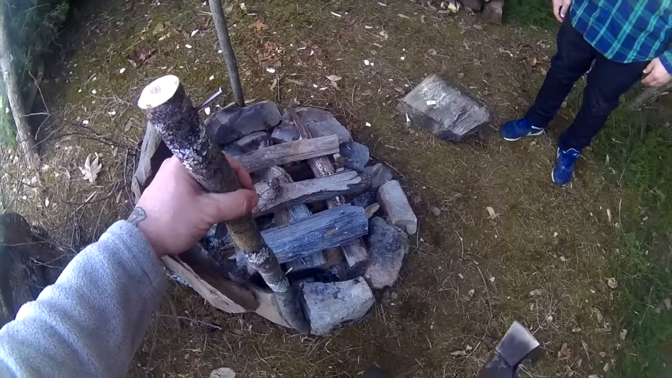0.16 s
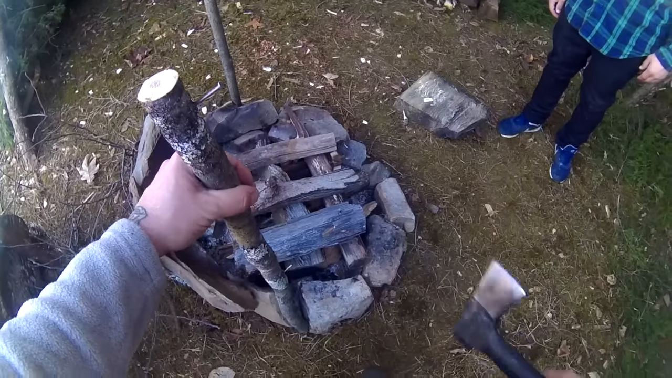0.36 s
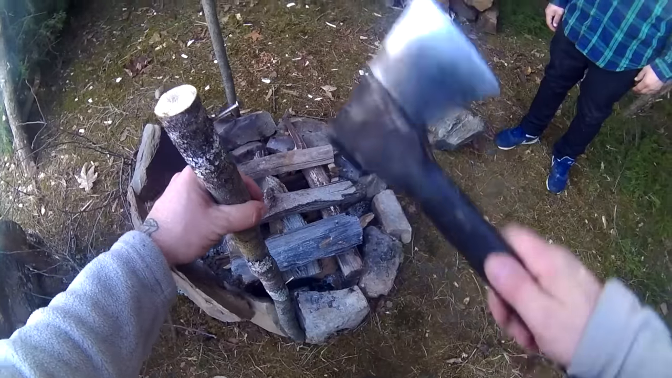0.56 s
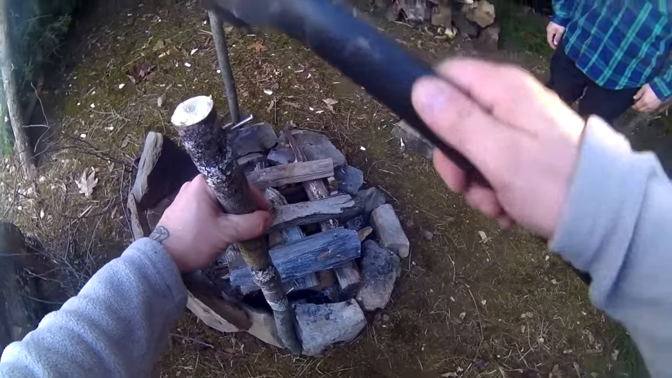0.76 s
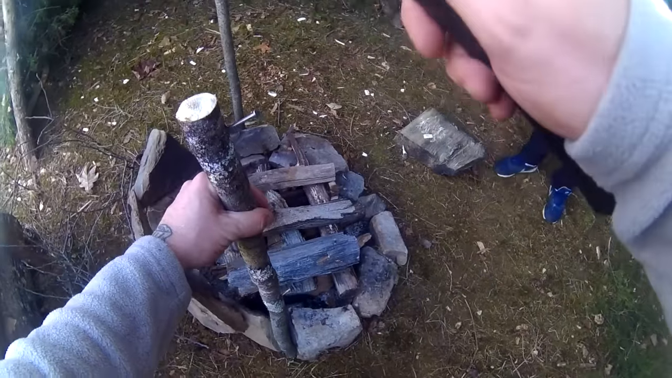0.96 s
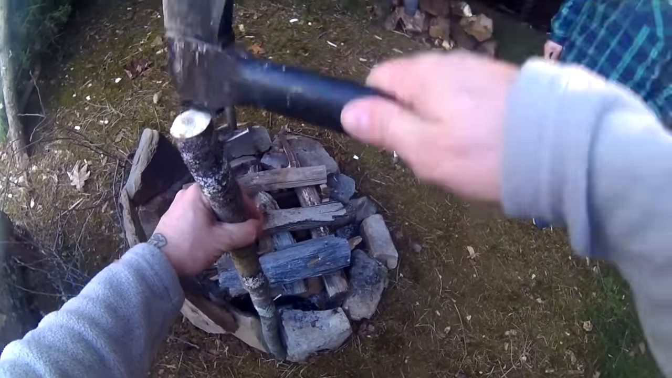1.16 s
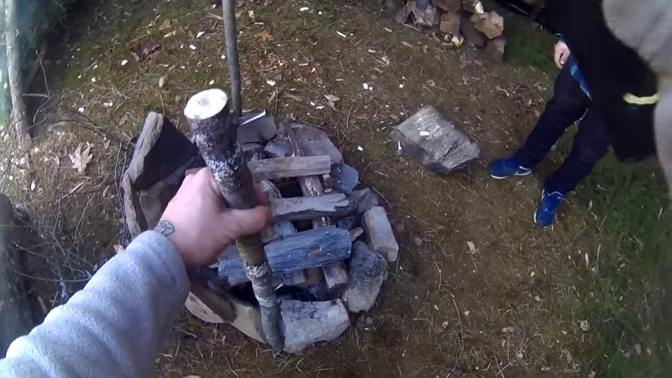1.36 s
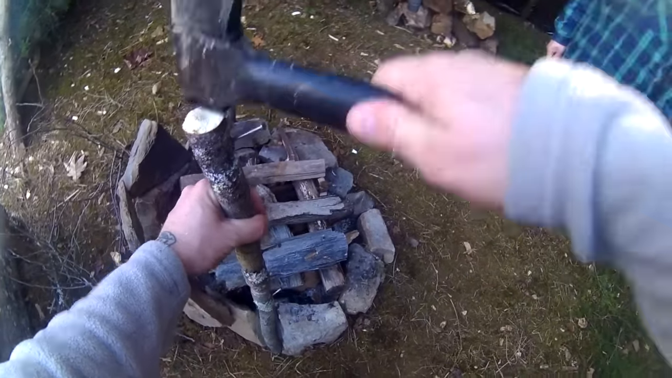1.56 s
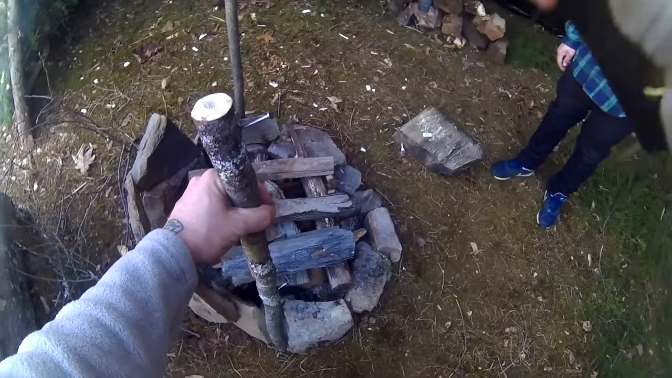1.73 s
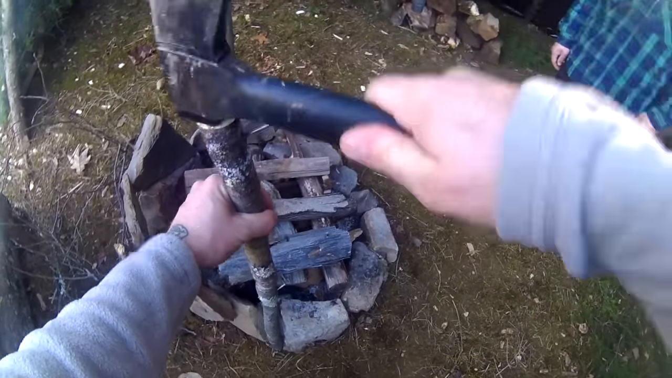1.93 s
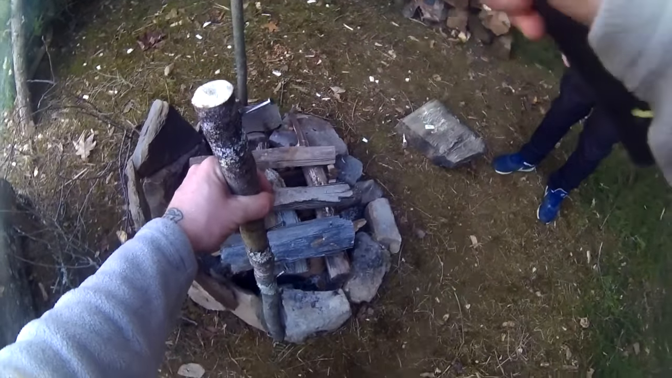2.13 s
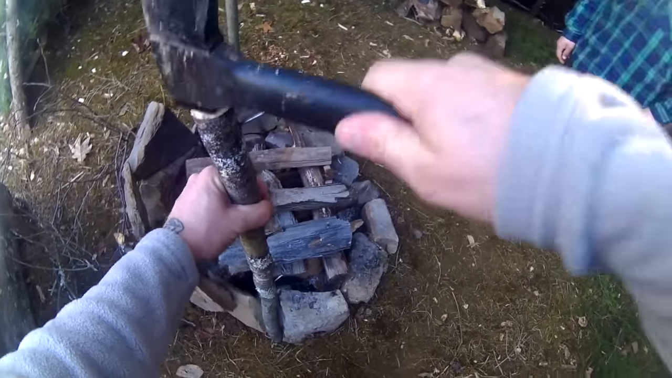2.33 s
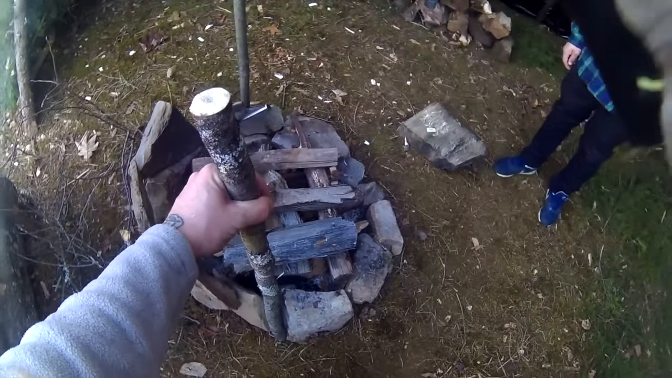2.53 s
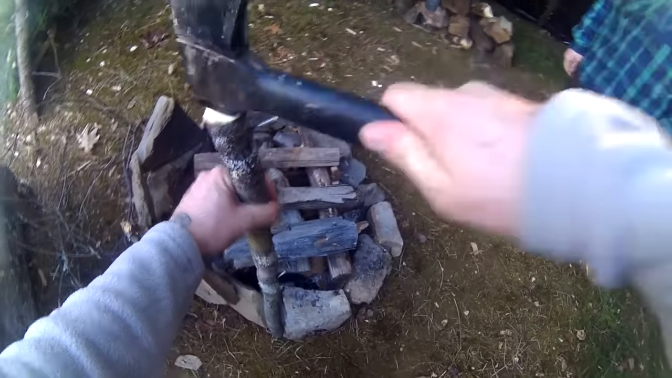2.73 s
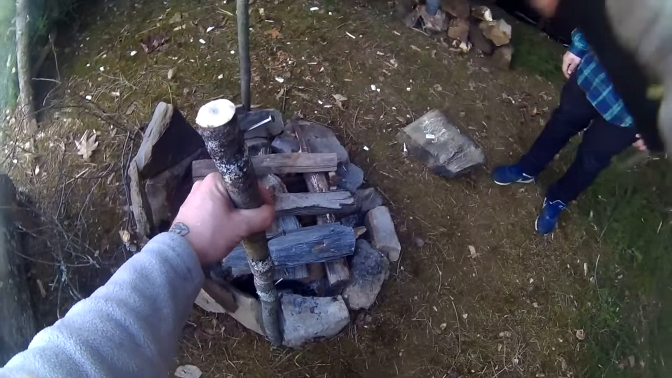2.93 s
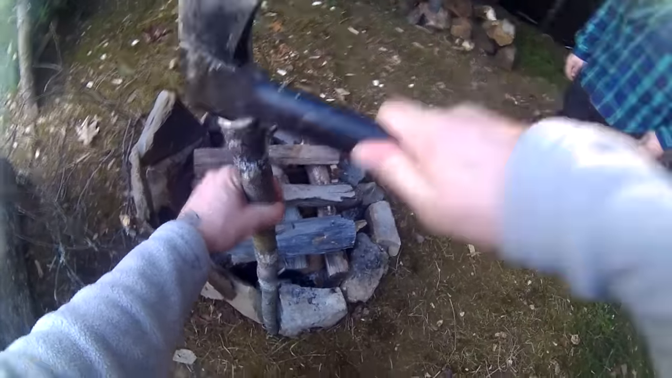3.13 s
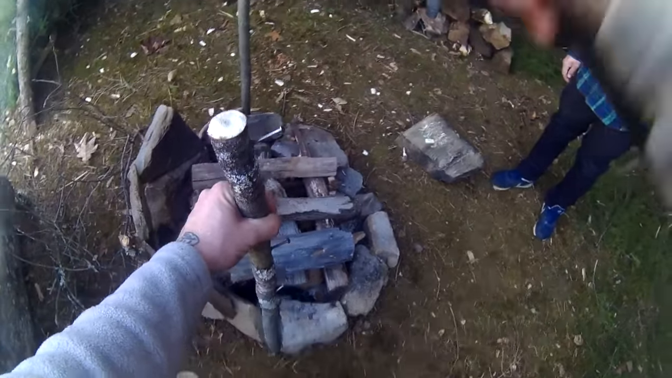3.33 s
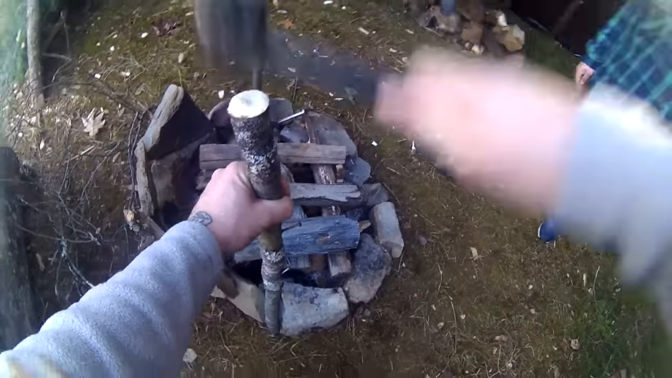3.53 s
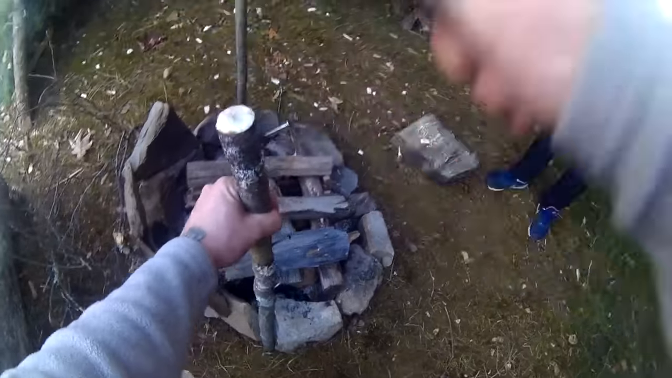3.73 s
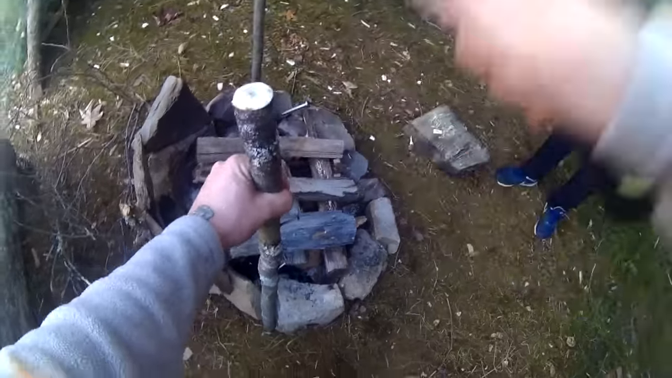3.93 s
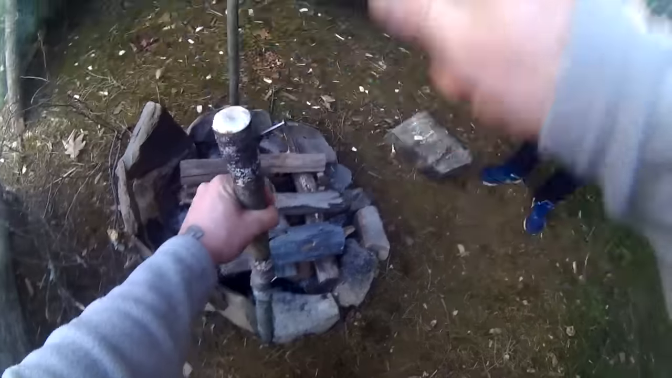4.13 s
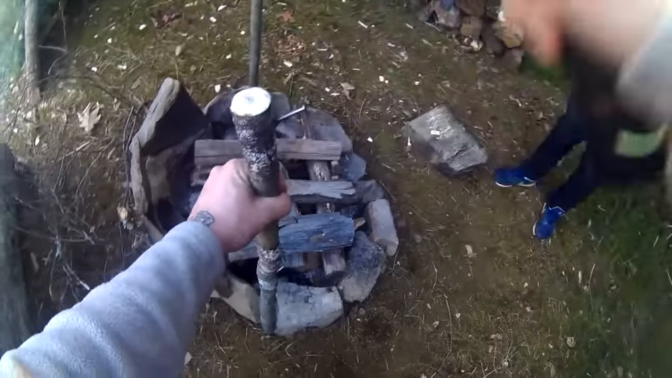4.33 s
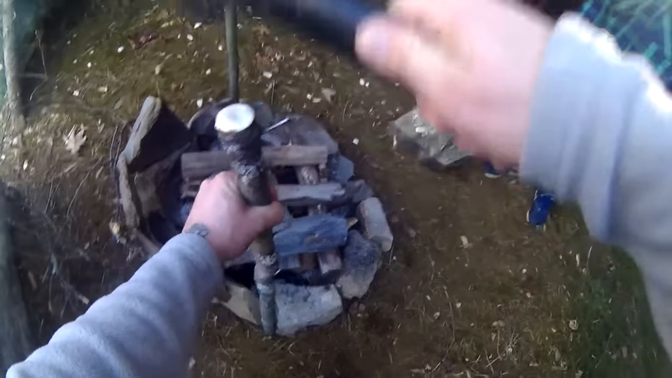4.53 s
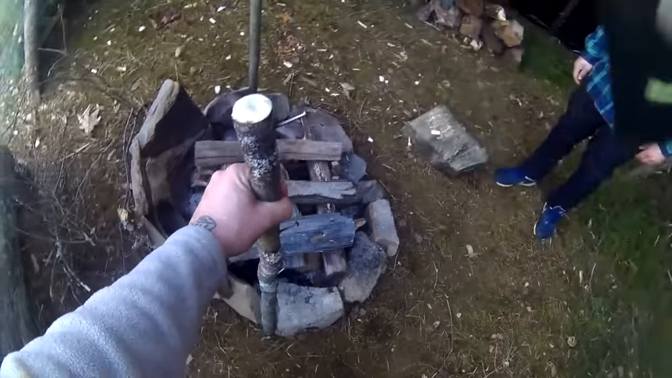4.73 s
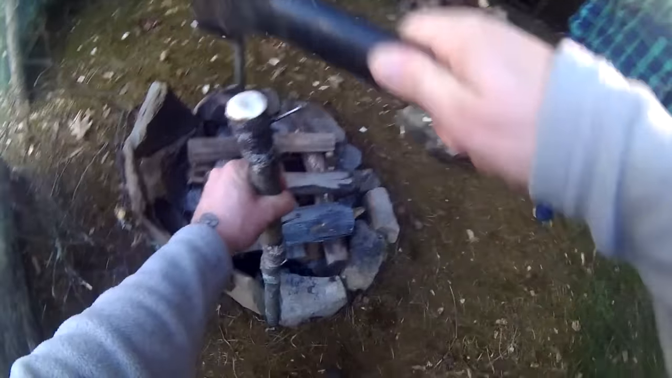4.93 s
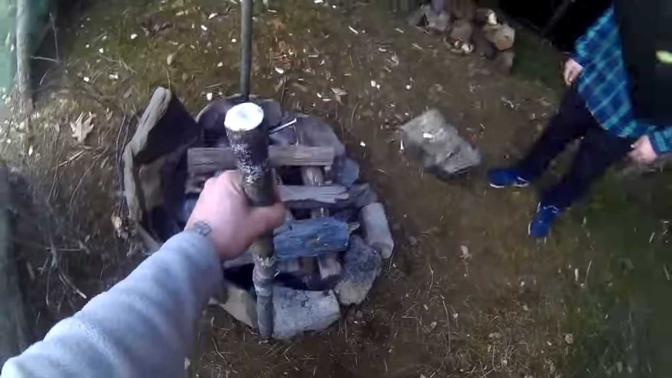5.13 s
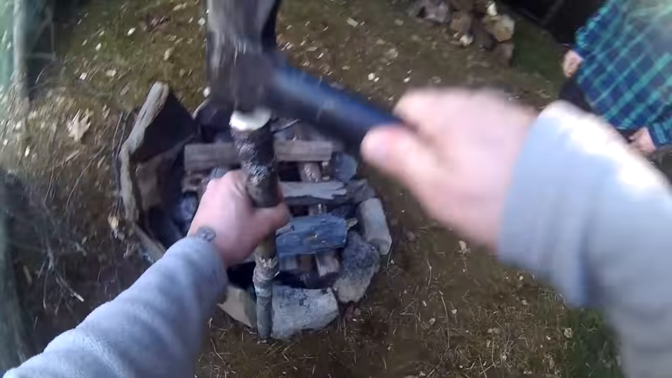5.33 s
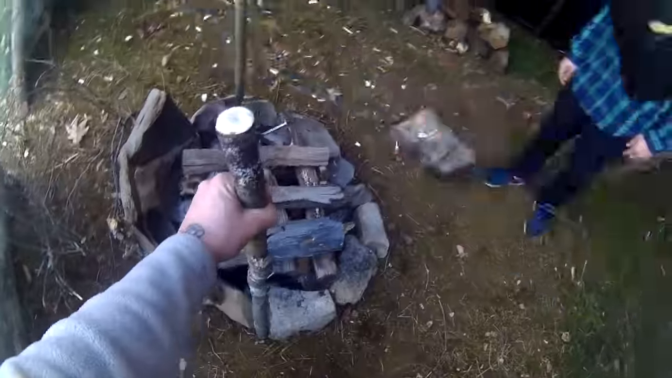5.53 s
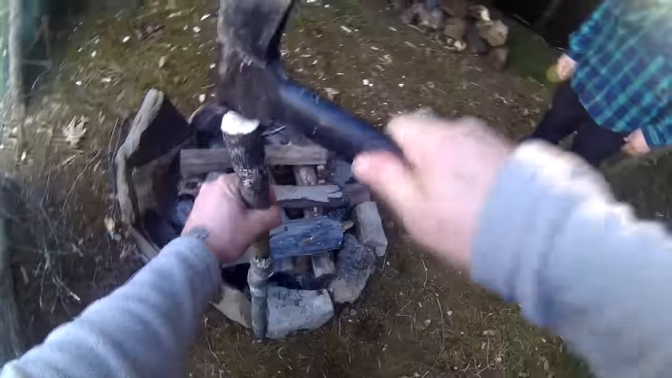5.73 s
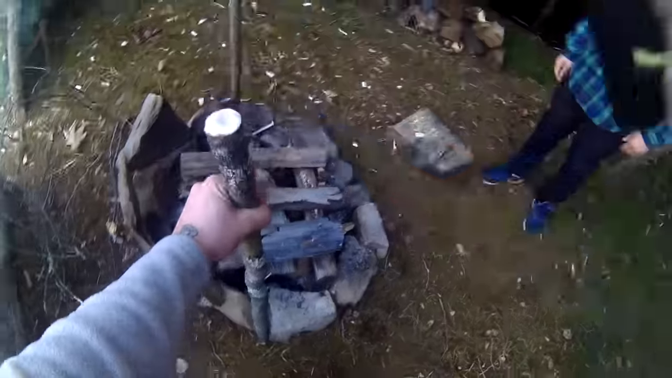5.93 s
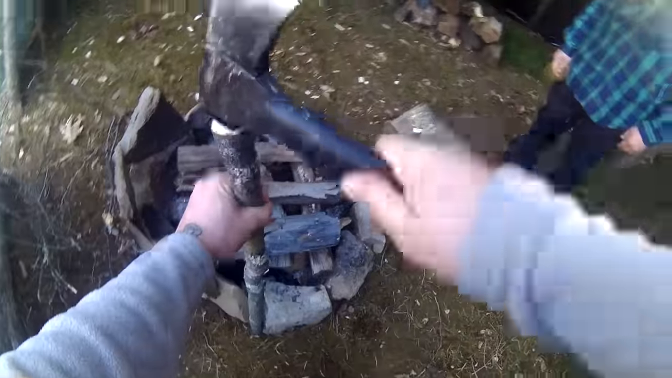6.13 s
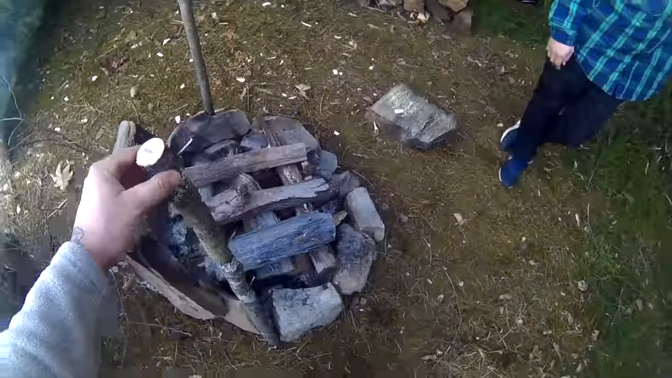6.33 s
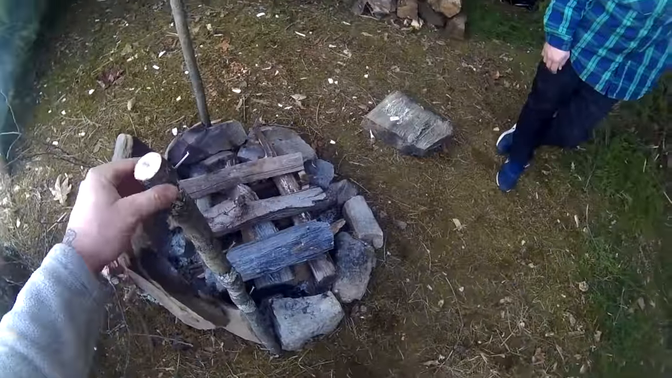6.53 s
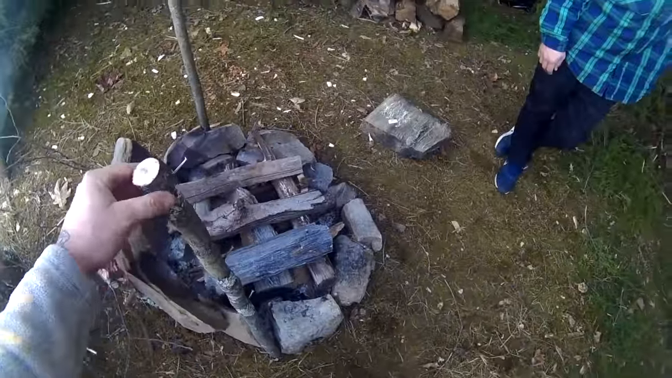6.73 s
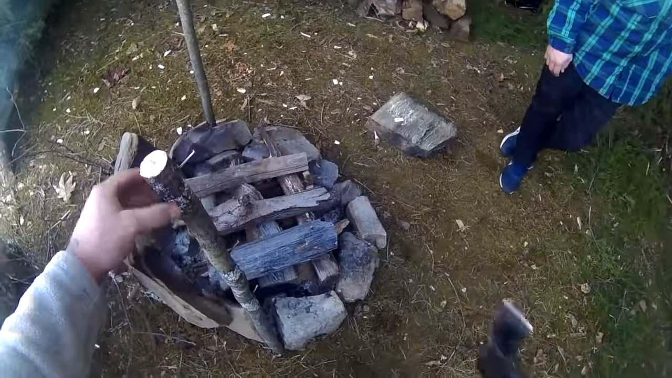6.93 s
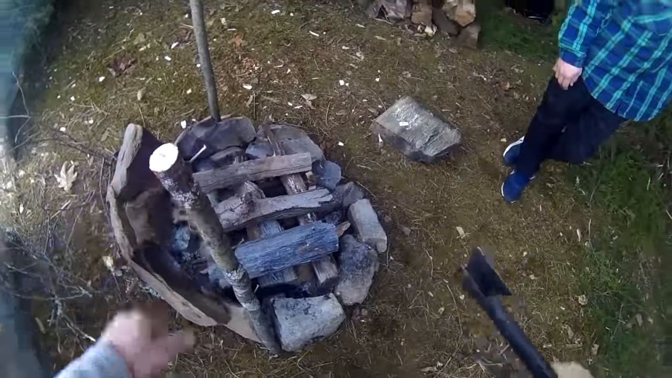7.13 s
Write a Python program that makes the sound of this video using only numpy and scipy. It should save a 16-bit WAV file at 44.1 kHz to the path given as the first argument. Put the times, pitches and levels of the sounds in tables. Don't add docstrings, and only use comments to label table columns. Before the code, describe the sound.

A sharp knock lands immediately at 0.02 s: a hatchet's blunt steel back on a wooden stake, very close and coloured by a ringing plastic case. About a second of quiet hiss, faint sleeve rustle and tiny scuffs follows. From 1.07 s the pounding resumes with a softer blow, a strong bright one at 1.46, then lesser hits at 1.85 and 2.23. From 2.68 to 6.03 s the knocks come evenly, about every 0.4 s, mostly loud and hard, with crisp metallic cracks, short woody thuds, a quick ground slap and a grainy echo dying within a fraction of a second. Low strap shudders and small taps fall between them, notably around 3.6, 5.7 and 6.1 s. After the last blow, only light taps at 6.4, 6.85 and 7.1 s, rustling, soft outdoor hiss, low hum, a very faint high whine and brief faint electronic buzzes remain.

```python
import sys
import numpy as np
from scipy import signal
from scipy.fft import rfft, irfft, next_fast_len
from scipy.io import wavfile
from scipy.ndimage import uniform_filter1d

SR = 44100
rng = np.random.default_rng(int(sys.argv[2]) if len(sys.argv) > 2 else 0)


def invert_db(x):
    u = np.asarray(x, float) / 20
    return 10 ** u


def store_pcm(level_fs):
    pcm = np.round(np.clip(level_fs, -1, 1) * 32767).astype(np.int16)
    wavfile.write(sys.argv[1], SR, np.atleast_2d(pcm).T)


N = 316193


def evened(x):
    return x / np.sqrt(np.mean(x ** 2) + 1e-20)


def peaked(x):
    return x / abs(x).max()


def read(points, hz):
    f, value = np.transpose(points)
    return np.interp(np.log(hz + 1), np.log(f + 1), value)


def add(mix, s, sound):
    part = mix[max(round(s * SR), 0):][:len(sound)]
    part += sound[:len(part)]


def band(x, lo_hz, hi_hz):
    return signal.sosfilt(signal.butter(2, [lo_hz, hi_hz], "bandpass", fs=SR, output="sos"), x)


def coloured(x, points):
    size = next_fast_len(len(x))
    gain = invert_db(read(points, np.fft.rfftfreq(size, 1 / SR)))
    return irfft(rfft(x, size) * gain, size)[:len(x)]


def fuzzy(hz, width):
    r = np.exp(-np.pi * width / SR)
    noise = rng.standard_normal(N) + 1j * rng.standard_normal(N)
    slow = signal.lfilter([1], [1, -2 * r, r * r], noise)
    carrier = np.exp(2j * np.pi * hz * np.arange(N) / SR)
    return evened((slow * carrier).real)


def rings(modes):
    t = np.arange(SR // 3) / SR
    return sum(invert_db(db - 60 * t / t60) * np.sin(2 * np.pi * hz * t) for hz, db, t60 in modes)


def driven(force, response):
    return signal.oaconvolve(force, response)[:len(force)]


def push(t, s, ms):
    u = np.clip((t - s) * 1000 / ms, 0, 1)
    return np.sin(np.pi * u) ** 2 / (ms * SR / 2000)


def debris(length, t60):
    t = np.arange(length) / SR
    swelling = invert_db(-60 * t / t60) * (1 - np.exp(-t / 0.0012))
    return swelling * rng.standard_normal(length) * (rng.random(length) < .3)


def swell(events, peak_s, rest_db, order):
    t = np.arange(N) / SR
    level = invert_db(rest_db)
    for s, db in events:
        u = np.maximum(t - s, 0) / peak_s
        level = level + invert_db(db) * (u * np.exp(1 - u)) ** order
    return level


# f/Hz, level/dB (per Hz)
AIR = [(15, -25), (25, -3), (68, 3), (108, -10.5), (170, -6), (560, -17), (1400, -21), (2990, -25),
       (8360, -28.5), (10100, -29.5), (11000, -27.5), (15700, -31), (16100, -50)]


def air():
    hz, t, z = signal.stft(rng.standard_normal(N), SR, nperseg=2048)
    smooth = uniform_filter1d(rng.standard_normal(z.shape), 12, 0)
    patches_db = .8 * evened(uniform_filter1d(smooth, 3, 1))
    wash = signal.istft(z * invert_db(read(AIR, hz)[:, None] + patches_db), SR, nperseg=2048)[1][:N]
    return invert_db(-66) * evened(wash)


# f/Hz, width/Hz, level/dB
HUM = [(58.4, 39, -77), (92.6, 5.9, -83.5), (119, 9, -79), (164.5, 29, -81.5)]


def hum():
    return sum(invert_db(db) * fuzzy(hz, width) for hz, width, db in HUM)


# f/Hz, level/dB
WHINE = [(9755, -97), (9905, -94), (9981, -85), (10018, -93), (10056, -86), (10137, -92), (10212, -94),
         (12699, -99)]


def whine():
    t = np.arange(N) / SR
    tones = sum(invert_db(db + 3) * np.sin(2 * np.pi * (hz * t + rng.random())) for hz, db in WHINE)
    return tones + invert_db(-85.5) * fuzzy(10020, 390)


# f/Hz, level/dB, t60/s
CASE = [(1105, -14.5, 0.015), (960, -32.5, .02), (1484, -21.5, 0.045), (1510, -27.5, 0.033),
        (1761, -18, 0.058), (1671, -33.5, 0.1), (2166, -26.5, 0.013), (2330, -25, 0.085),
        (2877, -19.5, 0.016), (4420, -50, 0.12)]
# f/Hz, level/dB
PORT = [(250, -53), (880, -11.5), (1030, -37.5), (1110, 2), (1550, 11.5), (1850, 4.5), (2900, -4.5),
        (3250, -22.5), (3800, -6.5), (4500, -9.5), (4950, -36), (5700, -15), (6600, -39), (9000, -49.5)]


def case(hard_db):
    hz = abs(np.fft.fftfreq(4096, 1 / SR))
    lift_db = hard_db / (1 + np.exp((2300 - hz) / 200))
    log_gain = np.log(invert_db(read(PORT, hz) + lift_db))
    colour = np.fft.ifft(np.exp(signal.hilbert(log_gain).conj())).real[:2048]
    response = rings(CASE)
    add(response, 0, peaked(colour))
    return response


# t/s, level/dB
RUSTLE = [(0.0, -69.5), (0.38, -85), (0.68, -71.5), (2.2, -79.5), (3.201, -70), (4.33, -80), (4.952, -75.5),
          (6.09, -76.5), (6.4, -72), (6.71, -72), (7.1, -71.5)]


def rustle():
    s, db = np.transpose(RUSTLE)
    grains = invert_db(1.9 * rng.exponential(1, N)) * rng.standard_normal(N)
    grains *= rng.random(N) < 2500 / SR
    level_db = np.interp(np.arange(N) / SR, s, db) - 8
    return invert_db(level_db) * evened(driven(grains, case(-5)))


def sway():
    swings = [(s, -45.5 + 0.87 * db) for s, db, *_ in BLOWS]
    jerks = [(s, -51 + 0.96 * db) for s, db, *_ in BLOWS]
    jerks += [(s, -20 + db + dull_db) for s, db, dull_db, *_ in TAPS]
    jolts = fuzzy(23, 18) + 0.7 * fuzzy(59, 50)
    nod = swell(swings, peak_s=0.15, rest_db=-71, order=4) * fuzzy(11.0, 5.2)
    return nod + swell(jerks, peak_s=0.024, rest_db=-75, order=1) * jolts


# f/Hz, level/dB, t60/s
CHEEK = [(4367, -21.5, 0.014), (4500, -23.5, 0.018), (4474, -43.5, 0.08), (5640, -34, 0.011)]


def head_ring(force, hard_db):
    return invert_db(1.1 * hard_db) * driven(force, rings(CHEEK))


# f/Hz, level/dB (per Hz)
STEEL = [(2500, -48.5), (5000, -13), (5700, -4.5), (6500, -12), (10700, -13), (12800, -38), (15000, -36),
         (16600, -56)]


def steel_crack(t):
    fall = invert_db(-60 * t / 0.011) + invert_db(-28.5 - 60 * t / 0.031)
    onset = 1 - np.exp(-t / 0.00024)
    return fall * onset * evened(coloured(rng.standard_normal(len(t)), STEEL))


# f/Hz, level/dB, t60/s
STAKE = [(360, 7.5, 0.0091), (583.2, 4, 0.013), (747, 8.5, 0.024), (904, 5.5, 0.016)]


def stake_bending(force):
    return driven(force, rings(STAKE))


# f/Hz, level/dB, t60/s
STAKE_HUM = [(321, 0, .13)]


def stake_hum(t, flat_s):
    return driven(push(t, flat_s, 2.2), rings(STAKE_HUM))


# f/Hz, level/dB, t60/s
LINGER = [(1358, -50, .07), (1725, -47, .07)]


def panels(t, flat_s):
    return driven(push(t, flat_s, .2) + invert_db(-18) * debris(len(t), 0.39), rings(LINGER))


# f/Hz, t60/s
SCATTER = [(300, 0.089), (1000, 0.061), (1600, 0.29), (2500, 0.32), (3200, 0.27), (5000, 0.27),
           (12000, .06)]


def scatter():
    hz, t, z = signal.stft(rng.standard_normal(SR // 2), SR, nperseg=128)
    fading = z * invert_db(-60 * t / read(SCATTER, hz)[:, None])
    tail = signal.istft(fading, SR, nperseg=128)[1][:SR // 2]
    return tail * np.clip(np.arange(SR // 2) / SR / 0.019, 0, 1)


def blow(nearby, strength_db, hard_db, steel_db, echo_db):
    t = np.arange(SR // 2) / SR
    flat_s, echo_s = 0.001472, 0.0074
    force = invert_db(-10) * push(t, 0, 0.15)
    force += invert_db(-7) * push(t, flat_s - .0007, 0.17) + push(t, flat_s, 0.11)
    force += invert_db(echo_db) * push(t, flat_s + echo_s, 0.29)
    force += invert_db(-22.5) * nearby + invert_db(-21.0) * debris(len(t), 0.041)
    knock = driven(force, case(hard_db))
    tail = driven(invert_db(-58.5) * scatter(), case(4))
    knock = peaked(band(knock + tail, 540, 11000))
    knock += panels(t, flat_s) + head_ring(force, hard_db)
    thud = peaked(band(stake_bending(force), 310, 950))
    low_hum = peaked(band(stake_hum(t, flat_s), 120, 710))
    wood = invert_db(-22 - 1.57 * hard_db) * thud + invert_db(-39.5 - 2.04 * hard_db) * low_hum
    return invert_db(strength_db) * (knock + wood) + invert_db(steel_db - 6.0) * steel_crack(t)


# t/s, strength level/dB, hardness/dB, steel crack level/dB, ground echo level/dB
BLOWS = [(0.024, -10.5, -1, -27, -11), (1.0742, -15.5, 0.5, -38.5, -4), (1.463, -8, 6, -22, -21.5),
         (1.8506, -10.5, 1, -37, -4.5), (2.227, -13.5, -0.5, -36.5, -7), (2.683, -8, 2.5, -33.5, -12),
         (3.0837, -6.5, 3, -24, -7.5), (3.508, -7, 1, -19, -11.5), (3.938, -5.5, 3, -23, -9.5),
         (4.3581, -6, 3.5, -21, -15), (4.781, -5, 5, -19, -14.5), (5.1953, -6, 3.5, -22, -21.5),
         (5.616, -5.5, 2, -22.5, -12), (6.0349, -5.5, 5.5, -23.5, -32)]


def blows():
    track = np.zeros(N)
    nearby = debris(SR // 2, .045)
    for s, *row in BLOWS:
        add(track, s + 0.0009, blow(nearby, *row))
    return track


def tap(strength_db, dull_db, hard_db, length_ms):
    t = np.arange(SR // 8) / SR
    grit = rng.standard_normal(len(t)) * np.exp(-t * 1000 / length_ms)
    grit[0] = 30 / length_ms
    knock = peaked(driven(band(grit, 302.3, 6000), case(hard_db)))
    woody = peaked(band(stake_bending(grit), 320, 670))
    woody_db = -8 - 0.15 * dull_db
    shove = push(t, 0.00047, 3.2) - 0.42 * push(t, 0.00528, 6.0)
    shove = peaked(band(shove, 44, 636))
    return invert_db(strength_db) * (knock + invert_db(woody_db) * woody + invert_db(dull_db) * shove)


# t/s, strength
# level/dB, dull part level/dB, hardness/dB, length/ms
TAPS = [(.11, -60.5, 13, -18, 16), (.56, -64, -29, -13, 40), (1.2, -60.5, -36, -13, 10),
        (1.303, -61, -17, -10, 45), (1.902, -44.5, -24, 6, 4.3), (3.595, -43.5, -5, -19, 1.2),
        (3.612, -57, 2, -5, 3.4), (3.63, -59.5, -13, -11, 32), (5.698, -42.5, 2.5, -14, 3.1),
        (5.716, -59, 10, -8, 2.7), (6.117, -41, 1, -16, 2.4), (6.376, -47, -16, -7, 2.2),
        (6.846, -58, -18, -3, 37), (7.09, -49, -6.5, -11.5, 4.6)]


def taps():
    track = np.zeros(N)
    for s, *row in TAPS:
        add(track, s - .001, tap(*row))
    return track


WRITES = [.372, .603, 0.904, 1.374, 1.576, 1.892, 2.19, 2.474, 2.893, 3.382, 3.782, 4.147, 4.546, 4.915,
          5.505, 5.85, 6.117, 6.6, 6.859, 7.103]
# f/Hz, level/dB
BUZZ = [(8850, -85), (9120, -77), (9400, -99)]


def memory_buzz():
    gate = np.zeros(N)
    for s in WRITES:
        add(gate, s, signal.windows.tukey(round(0.048 * SR), .6))
    return gate * sum(invert_db(db) * fuzzy(hz, 220) for hz, db in BUZZ)


def scene():
    mix = air() + hum() + whine() + rustle() + sway()
    mix += blows() + taps() + memory_buzz()
    return mix[None]


def roll_off(x):
    return signal.sosfilt(signal.butter(12, 16710, fs=SR, output="sos"), x)


def record(dry):
    ceiling = .8
    mix = ceiling * np.tanh(dry / ceiling)
    return roll_off(mix)


dry = scene()
out = record(dry)
store_pcm(out)
```